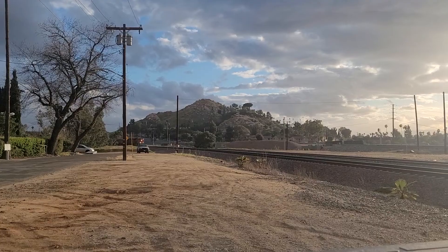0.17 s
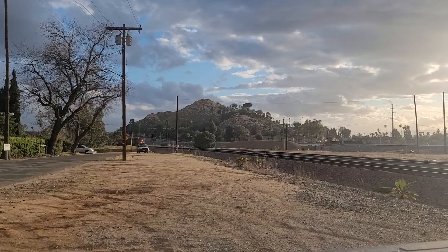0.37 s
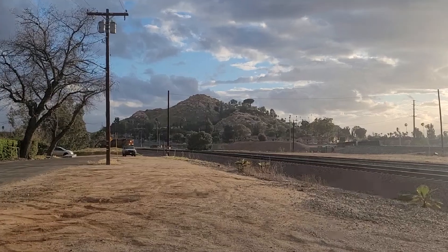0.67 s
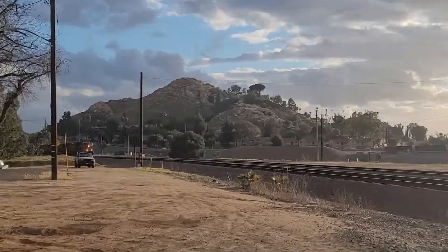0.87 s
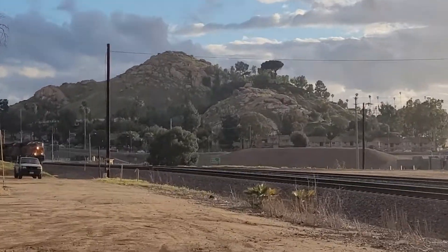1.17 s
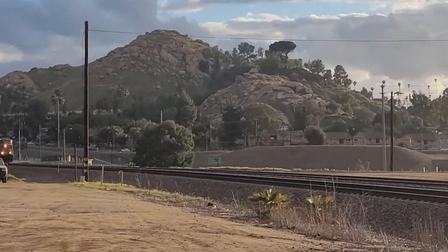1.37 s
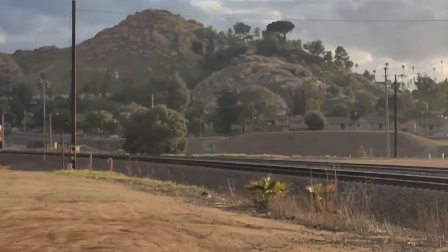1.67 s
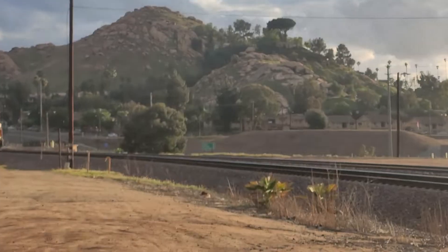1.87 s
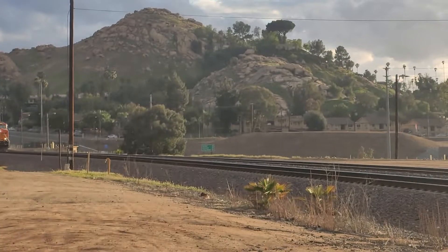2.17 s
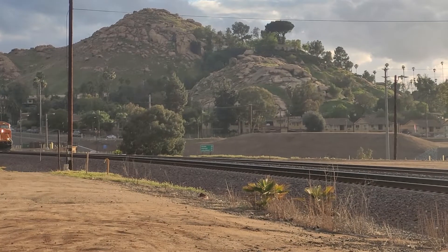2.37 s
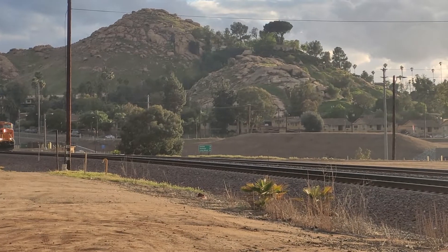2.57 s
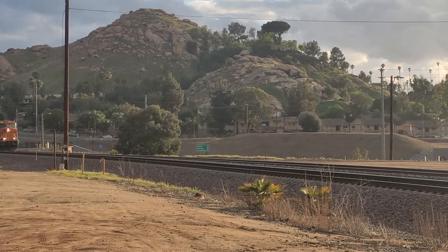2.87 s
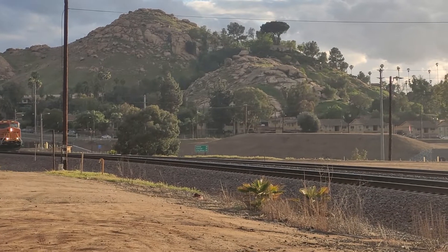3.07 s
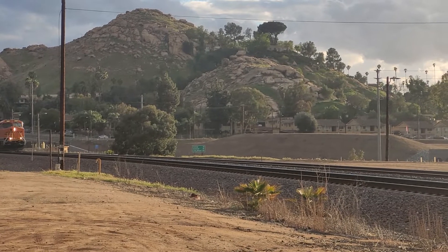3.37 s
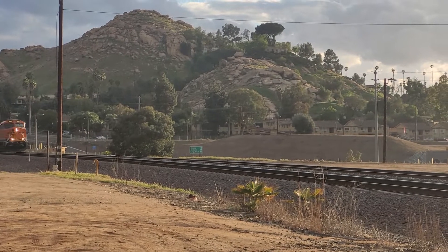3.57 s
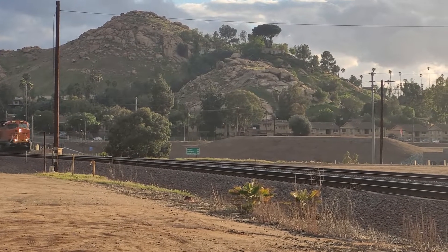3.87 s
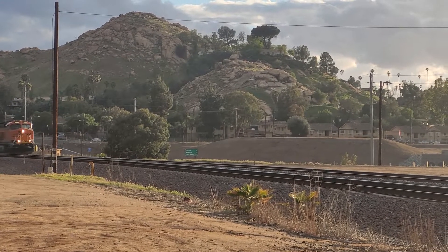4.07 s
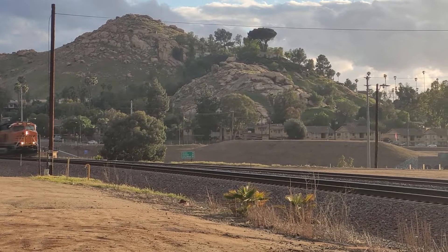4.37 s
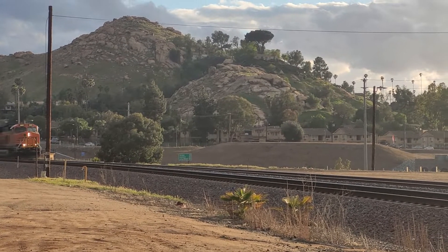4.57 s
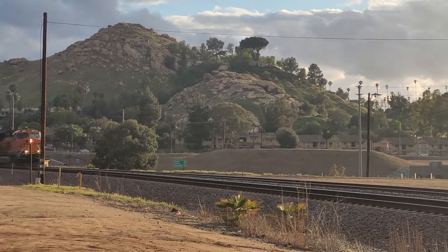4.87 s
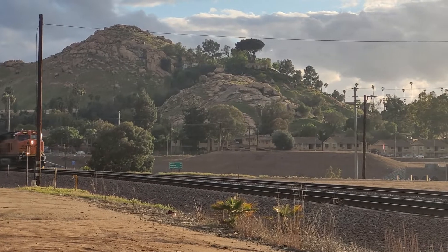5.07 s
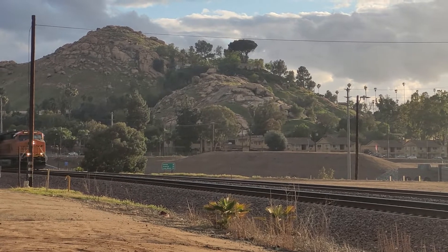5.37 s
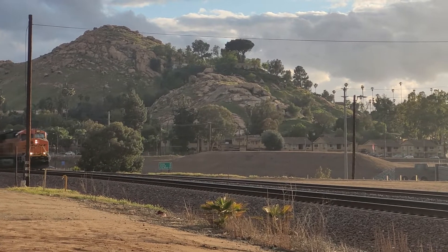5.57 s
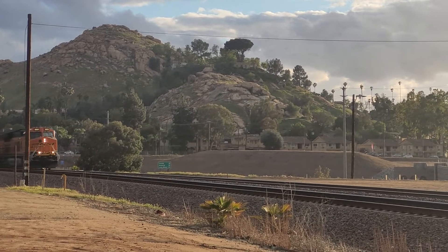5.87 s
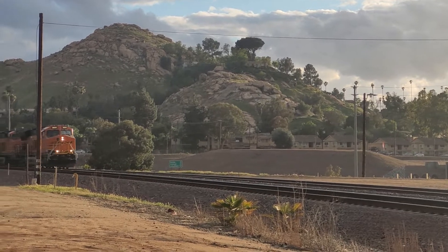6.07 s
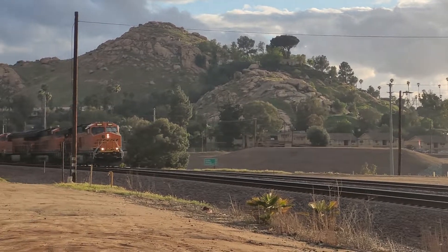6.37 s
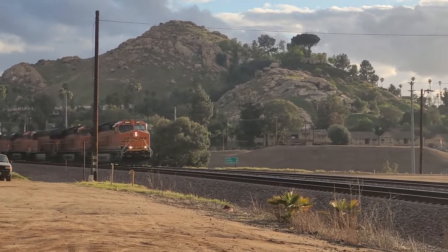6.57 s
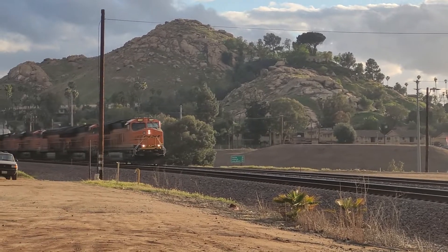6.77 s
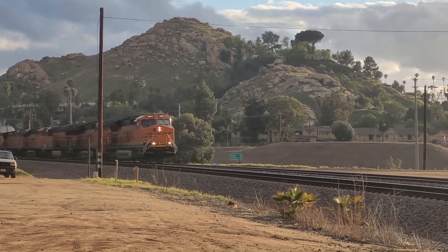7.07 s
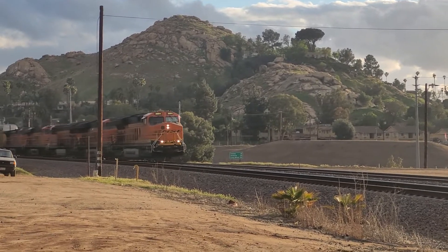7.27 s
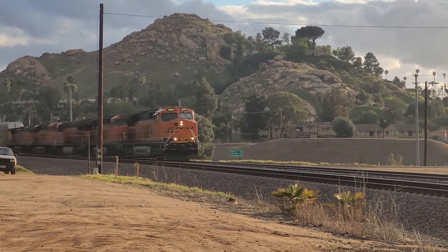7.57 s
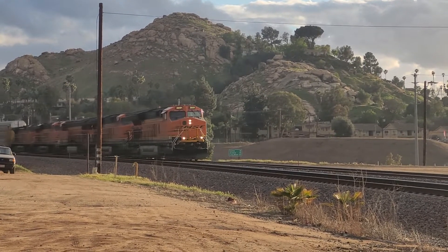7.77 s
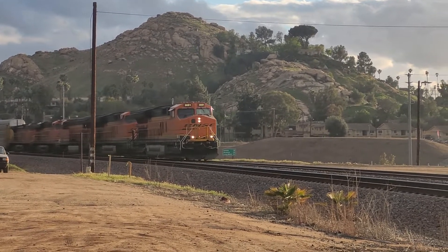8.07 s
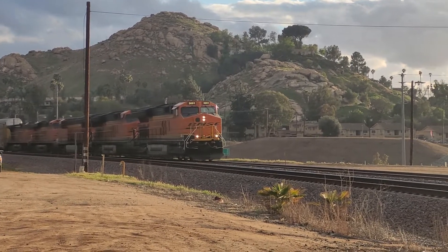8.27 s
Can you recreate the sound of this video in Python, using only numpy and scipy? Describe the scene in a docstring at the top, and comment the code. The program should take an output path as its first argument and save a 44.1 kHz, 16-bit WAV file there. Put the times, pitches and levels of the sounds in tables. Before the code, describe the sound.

Outdoors beside a rail line, an approaching freight locomotive throbs low and steady, with a soft fan whine, dull wheel roar and very high rail hiss mostly on the right. Just past the middle, one loud, buzzing five-note air horn blast lasts under a second, sags and dulls, leaving faint echoes from the hills. Then wheel sizzle and hiss grow fuller. Distant stereo microphone in the open.

```python
"""A freight train nears across open ground: its diesels throb on orders of the firing rate, a fan whines,
wheel noise roars low, and the rails give a broad, very high hiss, mostly on the right, jumping up partway.
Then a five-bell air horn gives one blast of buzzing harmonic stacks and mixed tones over turbulent air,
which sags and dulls as its valve closes and leaves dull, scattered echoes from the hills.
Afterwards a few faint tones swell, the wheel sizzle grows and the rail hiss becomes louder and fuller."""
import sys
import numpy as np
from scipy import signal
from scipy.fft import rfft, irfft, next_fast_len
from scipy.io import wavfile

SR = 44100
rng = np.random.default_rng(int(sys.argv[2]) if len(sys.argv) > 2 else 0)


def master(y):
    """Save y as 16-bit WAV."""
    cut = np.clip(np.atleast_2d(y).T, -1, 1)
    pcm = np.round(cut * 32767)  # scale
    wavfile.write(sys.argv[1], SR, pcm.astype(np.int16))


N = 371763

# Stereo image of the train. Each row: frequency in Hz, left-right likeness (1 is identical).
TRAIN_LIKENESS = [(60, 0.96), (260, 0.92), (520, 0.82), (780, 0.2), (1500, 0.028), (3600, 0.14),
                  (6500, 0.11), (10700, 0.15), (11500, 0.29), (12800, 0.68), (14600, 0.87), (16000, 0.82)]
# Stereo balance of the train. Each row: frequency in Hz, left minus right level in dB.
TRAIN_BALANCE = [(60, 4), (120, 1), (240, -1), (480, 1), (950, -1.5), (1890, 3), (3770, -7), (7520, 0.5),
                 (15000, -14)]

# Broad, very high hiss of the rails. Each row: frequency in Hz, relative power density in dB per Hz.
RAIL_SPECTRUM = [(9800, -54), (10300, -42), (10500, -13), (11500, -5), (12500, -1), (13700, -1.5),
                 (14200, 2), (15000, 2.5), (16000, 2)]
# Faint narrow peaks in the rail hiss. Each row: centre in Hz, width in Hz, relative level in dB.
RAIL_PEAKS = [(10710, 110, 4.5), (11700, 52, -1), (10900, 64, -18), (11100, 47, -15), (11940, 80, -13),
              (13000, 82, -16), (13900, 100, -8), (14000, 75, -24), (14700, 86, -21), (15060, 89, -20),
              (15700, 53, -7)]
# Course of the rail hiss. Each row: time in seconds, level in dB, share of its lower part removed (0 to 1).
RAIL_COURSE = [(0.0, -35.5, 0.99), (0.55, -35, 1), (1.85, -40.5, 0.99), (2.1, -36, 1), (2.85, -35, 0.92),
               (3.15, -37.5, 0.83), (3.17, -32, 0.4), (3.75, -29.5, 0.61), (4.4, -33, 0.53),
               (5.4, -28, 0.78), (6.1, -34, 0.18), (6.5, -30, 0.084), (8.43, -28, 0.068)]
RAIL_LEAD_S = -0.00054   # negative: the right port hears the rails first

# Levels of the train noise; rumble and roar sink for a while after the horn, then rise again.
# Each row: time in seconds, rumble level in dB, roar level in dB, sizzle level in dB.
TRAIN_LEVELS = [(0.0, -32, -40.5, -66), (1.2, -30, -40, -58.5), (1.7, -30.5, -40.5, -62),
                (3.1, -28, -40, -55.5), (3.5, -31, -41, -53.5), (4.4, -31.5, -40, -51),
                (5.4, -36, -41, -51.5), (6.1, -37, -45, -52), (6.6, -32, -40.5, -47.5),
                (7.2, -31, -39.5, -45), (8.0, -29.5, -39.5, -44), (8.43, -28.5, -39, -44)]
# Low wheel noise. Each row: frequency in Hz, relative power density in dB per Hz.
ROAR_SPECTRUM = [(120, -9), (185, -7), (215, -11), (244, -10), (281, -5.5), (335, -15.5), (505, -12),
                 (727, -14), (1010, -12.5), (1670, -14.5), (3300, -36.5), (4290, -31), (7260, -120)]
# A drone in the roar. Each row: centre in Hz, width in Hz, relative level in dB.
ROAR_DRONE = [(454.5, 4.1, -2), (503.5, 10.7, 0.3), (904, 17, -5), (984.6, 13.4, 2.5), (1447, 19, -2.5),
              (2025, 245, -11.5)]
# Bright wheel noise. Each row: frequency in Hz, relative power density in dB per Hz.
SIZZLE_SPECTRUM = [(2300, -8.5), (2830, -11), (4100, 1), (5400, -6), (6100, -2.5), (6960, -4),
                   (7720, -18.5), (8500, -5), (8900, -16.5), (10000, -21)]
SIZZLE_FAR_DULLING = 1.06   # dB of treble lost per dB that the sizzle is below its closest level

# Tone of the fan. Each row: time in seconds, pitch in Hz, level in dB.
FAN_COURSE = [(0, 218, -48), (1.8, 218.5, -44), (2.7, 218.5, -41), (3.4, 219, -44), (4.3, 220.5, -43),
              (5.4, 219.5, -46), (6.0, 216, -43), (6.8, 210, -41), (7.5, 208, -39.5), (7.9, 206.5, -40),
              (8.43, 204.5, -44)]
FAN_OCTAVE_DB = -19   # second partial relative to the first
# Thin tones that each swell once. Each row: middle in seconds, half width in seconds, pitch in Hz, level in dB.
SWELLING_TONES = [(6.45, .35, 446, -51), (6.45, .5, 479, -51), (6.5, .3, 587, -54), (6.75, .3, 881, -52),
                  (6.95, .28, 497, -49), (7.2, .4, 896, -54), (7.75, .55, 985, -56), (8.0, .3, 481, -53)]

FIRING_HZ = 19.9
# Orders of the diesels' firing rate. Each row: multiple of the firing rate, relative level in dB.
FIRING_ORDERS = [(2.001, -8), (3, 5), (3.6, -34), (5, 1.5), (6, -4), (7, -4.5)]
# Broad engine noise. Each row: frequency in Hz, relative power density in dB per Hz.
RUMBLE_SPECTRUM = [(22, -41), (34, -28), (40, 0.5), (60, 0.5), (107, -1.5), (135, -7.5), (187, -17),
                   (243, -16.5), (330, -35)]
THROB_SHARE_DB, RUMBLE_SHARE_DB = -2, -1.5

HILLS_T60_S, HILLS_DB, HILLS_CUT_HZ = 1.35, -26, 1300
HILLS_BLUR = .6   # moving air on the long way round smears the echoed tones

# Horn bells. Each row: settled pitch in Hz, then the relative levels in dB of its partials in order.
HORN_BELLS = [(274.8, -23.5, -22.5, -34, -28.5, -41, -38, -45, -60, -49, -60, -52, -55, -52, -54, -58),
              (325.5, -34, -23.5, -30.5, -32.5, -42, -45, -51, -54, -54, -52, -52, -51, -54),
              (379.1, -29, -27, -47, -43, -41, -51, -48, -52, -56, -53, -58, -63, -71),
              (495.0, -24, -29, -33, -43, -48, -55, -48, -51, -60, -73),
              (531.2, -21, -30, -50, -43, -48, -52, -47, -58, -70)]
# Tones mixed by bells that pull on each other through one air line. Each row: bell index, its multiple,
# other bell index, its multiple, relative level in dB.
MIXED_TONES = [(4, 1, 0, -1, -40), (4, 1, 0, 1, -43), (4, 1, 0, 2, -31), (4, 1, 0, 3, -46),
               (4, 1, 0, 4, -44), (4, -1, 0, 3, -48), (4, -1, 0, 4, -43), (4, -1, 0, 5, -42),
               (4, -1, 0, 6, -46), (4, -1, 0, 7, -50), (4, -1, 0, 8, -47), (4, 2, 0, -2, -41),
               (4, 4, 0, -2, -52), (4, 3, 0, 2, -49), (4, 4, 0, 2, -51), (1, 1, 0, 1, -42),
               (3, 2, 2, 2, -52), (1, 3, 0, 3, -52), (4, 1, 2, 1, -52), (2, 1, 0, 1, -45),
               (4, 1, 3, 1, -46), (1, 1, 0, 4, -47), (0, 1, 2, 3, -43), (3, 1, 2, 4, -50),
               (4, -1, 3, 4, -47), (4, 1, 1, -1, -52), (1, 1, 2, 1, -51)]
# The lowest and highest bell also mix all through this band.
REEDY_LOW_HZ, REEDY_HIGH_HZ, REEDY_DB = 1700, 4300, -58
# Partials that stand out or hang back while the pitch is still sharp. Each row: bell index, partial number,
# level offset in dB.
UNSETTLED_PARTIALS = [(0, 3, 13), (1, 1, -4), (1, 3, -9), (1, 4, 6), (2, 2, -11), (3, 2, -9), (3, 3, -4)]
# Partials that swell or sink through the hold. Each row: bell index, partial number, slope in dB per second.
LEANING_PARTIALS = [(0, 1, -5), (0, 2, -7), (0, 3, -8), (0, 6, 8), (1, 4, -10), (2, 2, 9), (2, 5, 8)]
# Pitch change of the diaphragms. Each row, one per bell: sharpness at the start in percent,
# sag as the air runs out in percent per second.
BELL_PITCH_DRIFT = [(3.2, 0), (2.7, 6), (3.0, 0), (2.7, 6), (1.6, 6)]
# Response of the bells to the valve. Each row, one per bell: speech delay in seconds, share of the closing fade.
BELL_RESPONSE = [(.013, .8), (.014, .4), (.001, .9), (.017, .75), (.018, .9)]
# Air rush in the bells. Each row: frequency in Hz, relative power density in dB per Hz.
RUSH_SPECTRUM = [(200, -42), (500, 2.5), (1000, -6), (1250, -8), (1500, 2.5), (2200, -7), (2900, -12),
                 (3900, -7), (5000, -27.5), (6000, -59), (7200, -45), (10300, -52.5)]
# Stereo image of the air rush. Each row: frequency in Hz, left-right likeness.
RUSH_STEREO = [(200, .95), (2000, .8), (4000, .75), (10000, .5)]
# Stereo balance of the horn. Each row: frequency in Hz, left minus right level in dB.
HORN_STEREO_BALANCE = [(60, -4), (130, 14), (290, -1), (640, -1.0), (1410, 0), (3100, 5.5), (6820, -48),
                       (15000, 10)]
HORN_LEAD_S = 0.000095   # the left port hears the horn first

# The valve opens, holds and closes, then the diaphragms stall.
OPEN_AT_S, CLOSE_AT_S, STALL_AT_S = 4.384, 5.103, 5.31
HOLD_DB, ATTACK_S, BRIGHTEN_S, SETTLE_S = 4, 0.0079, 0.034, .08
FADE_DB_PER_S, FADE_QUICKENS_DB_PER_S2, STALL_DB_PER_S = 27, 170, 480
START_DULL_DB_PER_OCTAVE, HOLD_DULL_DB_PER_OCTAVE, DULLING_DB_PER_OCTAVE_PER_S = 9.5, -0.18, 66
DULLING_LAG_S = .03   # the treble holds a little after the valve starts to close
RUSH_DB, RUSH_FOLLOWS_DULLING = -27, 0.73   # held level; dB lost per dB per octave of dulling
RUSH_LAG_S, RUSH_RISE_DB_PER_S = .06, 900   # the rush reaches full strength after the tones
WANDER = .0004   # share by which each diaphragm's pitch wanders
BITE_DB = 3.5   # extra treble while the diaphragms settle
GUST_DB = 1.3   # moving air makes the whole top of the horn swell and sink together
# A small click is heard: time skips ahead by some milliseconds, shifting only the horn tones.
SKIP_AT_S, SKIP_S, SKIP_GAP_S = 4.9894, .0231, .00011

GAIN_KNEE_DB, GAIN_SLOPE, GAIN_MEMORY_S = -22, 0.26, 0.075   # slope: dB taken off per dB above the knee
CUTOFF_HZ = 15720


def from_db(db):
    """Amplitude gain is ten to the power of decibels over twenty."""
    return 10 ** (np.asarray(db) / 20)


def rms_one(x):
    """Normalisation: division by the root mean square gives unit effective amplitude."""
    return x / np.sqrt(np.mean(x ** 2) + 1e-20)


def in_time(rows):
    """Linear interpolation gives each column of a time table at every sample."""
    s, *columns = np.transpose(rows)
    return [np.interp(np.arange(N) / SR, s, column) for column in columns]


def at_hz(points, hz):
    """Interpolation on a log-frequency axis spaces a spectrum by musical interval."""
    table_hz, values = np.array(points).T
    return np.interp(np.log(hz), np.log(table_hz), values)


def drift(rate_hz):
    """Random fluctuation: white noise through a two-pole low-pass, with spread 1."""
    step = 40   # samples per slow value
    pole = np.exp(-2 * np.pi * rate_hz * step / SR)
    noise = rng.standard_normal(N // step + 2002)
    slow = signal.lfilter([1], [1, -2 * pole, pole * pole], noise)[2000:]   # drop the filter's start-up
    return np.interp(np.arange(N) / step, np.arange(len(slow)), rms_one(slow))


def sides(balance_db):
    """Level panning: a left-minus-right level is split equally between both sides."""
    return from_db(np.array([balance_db / 2, -balance_db / 2]))


def stereo_noise(spectrum, balance, patchy_db, flicker_rate, count, lead_s=0, peaks=(), peaks_db=0,
                 likeness=TRAIN_LIKENESS):
    """Partly coherent noise, shaped in frequency, in bands that flicker partly together; mid rms is 1."""
    size = next_fast_len(N)
    hz = np.maximum(np.arange(size // 2 + 1) * SR / size, 1)
    mid, side = rfft(rng.standard_normal((2, size)))
    alike = np.clip(at_hz(likeness, hz), -.99, .99)
    both = np.sqrt(1 + alike) * mid + np.sqrt(1 - alike) * side * [[1], [-1]]
    both[0] *= np.exp(2j * np.pi * hz * lead_s)   # a phase slope advances the left side
    power = from_db(2 * at_hz(spectrum, hz))
    for centre, width, level_db in peaks:
        power = power + from_db(2 * (level_db + peaks_db)) / (1 + (2 * (hz - centre) / width) ** 2)
    both = both * np.sqrt(power) * sides(at_hz(balance, hz))
    edges = np.geomspace(spectrum[0][0], spectrum[-1][0], count + 1)
    together = drift(flicker_rate)
    out = 0
    for low, high in zip(edges, edges[1:]):
        band = irfft(both * ((hz >= low) & (hz < high)), size)[:, :N]
        out = out + band * from_db(patchy_db * (0.21 * together + drift(flicker_rate)))
    return out / np.sqrt(np.mean(out.mean(axis=0) ** 2))


def rails():
    """Band-shaped noise: broad, very high hiss with a few faint narrow peaks; its lower part comes and goes."""
    hiss_db, dull = in_time(RAIL_COURSE)
    hiss = stereo_noise(RAIL_SPECTRUM, TRAIN_BALANCE, patchy_db=1.6, flicker_rate=12.0, count=5,
                        lead_s=RAIL_LEAD_S, peaks=RAIL_PEAKS, peaks_db=-12.0)
    lower = signal.sosfiltfilt(signal.butter(3, 12600, fs=SR, output="sos"), hiss)
    return from_db(hiss_db) * (hiss - np.clip(dull, 0, 1) * lower)


def wheels(roar_db, sizzle_db):
    """Broadband wheel noise: a low roar with a drone, and a sizzle losing less treble as it nears."""
    roar = stereo_noise(ROAR_SPECTRUM, TRAIN_BALANCE, patchy_db=0.77, flicker_rate=13.0, count=4,
                        peaks=ROAR_DRONE, peaks_db=-7)
    sizzle = stereo_noise(SIZZLE_SPECTRUM, TRAIN_BALANCE, patchy_db=.9, flicker_rate=11.0, count=4,
                          lead_s=HORN_LEAD_S)
    top = signal.sosfiltfilt(signal.butter(2, 5200, "high", fs=SR, output="sos"), sizzle)
    top_kept = from_db(SIZZLE_FAR_DULLING * (sizzle_db - sizzle_db.max()))
    return from_db(roar_db) * roar + from_db(sizzle_db) * (sizzle - (1 - top_kept) * top)


def faint_tones():
    """Amplitude envelopes: thin sines from the train each swell and sink along a bell curve."""
    t = np.arange(N) / SR
    out = 0
    for middle_s, width_s, hz, level_db in SWELLING_TONES:
        swell = np.exp(-((t - middle_s) / width_s) ** 2) * from_db(level_db + drift(2))
        out = out + swell * np.sin(2 * np.pi * hz * t + .6 * drift(2))
    return np.sqrt(2) * out


def fan():
    """Frequency modulation: the phase integrates a changing pitch, giving an unsteady tone and its octave."""
    hz, level_db = in_time(FAN_COURSE)
    wobble_db = .9 * drift(3)
    phase = 2 * np.pi * np.cumsum(hz) / SR + .1 * drift(4)
    tone = np.sin(phase) + from_db(FAN_OCTAVE_DB) * np.sin(2 * phase)
    return np.sqrt(2) * from_db(level_db + wobble_db) * tone


def diesels():
    """Periodic firing excites low orders, each swelling on its own, over broad rumble; rms is about 1."""
    turns = 2 * np.pi * np.cumsum(FIRING_HZ * (1 + .002 * drift(.3))) / SR
    throb = 0
    for order, level_db in FIRING_ORDERS:
        phase = order * turns + 0.32 * drift(1.2) + 2 * np.pi * rng.random()
        throb = throb + from_db(level_db + 3.84 * drift(1.26)) * np.sin(phase)
    throb = rms_one(throb) * sides(0.43)[:, None]
    rumble = stereo_noise(RUMBLE_SPECTRUM, TRAIN_BALANCE, patchy_db=-0.5, flicker_rate=4.9, count=3)
    return from_db(THROB_SHARE_DB) * throb + from_db(RUMBLE_SHARE_DB) * rumble


def hills(x):
    """Diffuse reflection: convolution with dull, decaying noise that differs on each side."""
    t = np.arange(round(1.6 * SR)) / SR
    shared, own = rng.standard_normal(len(t)), rng.standard_normal((2, len(t)))
    response = (shared + 1.05 * own) * from_db(-60 * t / HILLS_T60_S) * (t > .04)
    response = signal.sosfilt(signal.butter(1, HILLS_CUT_HZ, fs=SR, output="sos"), response)
    response /= np.sqrt(np.sum(response ** 2, axis=1, keepdims=True))   # unit energy
    x = x * (1 + HILLS_BLUR * drift(10)) / np.hypot(1, HILLS_BLUR)
    return signal.fftconvolve(x, response, axes=1)[:, :N]


def air_pressure(t):
    """Valve transients: air pressure governs each bell's loudness, the treble lost and the unsettled pitch."""
    since, closing, stalled = (np.maximum(t - at, 0) for at in (OPEN_AT_S, CLOSE_AT_S, STALL_AT_S))
    late_s, fade_share = np.transpose(BELL_RESPONSE)[:, :, None]
    attack = 1 - np.exp(-np.maximum(since - late_s, 0) / ATTACK_S)
    fade_db = (FADE_DB_PER_S + FADE_QUICKENS_DB_PER_S2 * closing) * closing
    loud_db = HOLD_DB + 40 * np.log10(1e-3 + attack) - fade_share * fade_db - STALL_DB_PER_S * stalled
    lack_db = START_DULL_DB_PER_OCTAVE * np.exp(-(since / BRIGHTEN_S) ** 2 / 2)
    lack_db = lack_db + DULLING_DB_PER_OCTAVE_PER_S * np.maximum(closing - DULLING_LAG_S, 0)
    unsettled = np.exp(-(since / SETTLE_S) ** 2)
    return loud_db, lack_db, unsettled, closing


def horn_partials(t, unsettled, pitch):
    """Nonlinear coupling: harmonics of each bell, with sum and difference tones between the bells."""
    early_db = {(bell, k): db for bell, k, db in UNSETTLED_PARTIALS}
    lean = {(bell, k): slope for bell, k, slope in LEANING_PARTIALS}
    from_middle = np.minimum(t, CLOSE_AT_S) - (OPEN_AT_S + CLOSE_AT_S) / 2
    partials = []
    for a, bell in enumerate(HORN_BELLS):
        for k, db in enumerate(bell[1:], 1):
            level_db = db + early_db.get((a, k), 0) * unsettled + lean.get((a, k), 0) * from_middle
            partials.append((a, k, a, 0, level_db))
    reedy = [(4, j, 0, k, REEDY_DB) for j in range(1, 8) for k in range(1, 15)
             if REEDY_LOW_HZ < j * pitch[4] + k * pitch[0] < REEDY_HIGH_HZ]
    return partials + MIXED_TONES + reedy


def horn():
    """Diaphragms buzz in harmonic stacks; turbulent air rushes and makes high partials waver."""
    span = slice(round(OPEN_AT_S * SR), round((STALL_AT_S + .2) * SR))
    t = np.arange(N)[span] / SR
    loud_db, lack_db, unsettled, closing = air_pressure(t)
    dulling_db = HOLD_DULL_DB_PER_OCTAVE + lack_db
    pitch = [bell[0] for bell in HORN_BELLS]
    pitch_ratio = np.array([1 + (start * unsettled - sag * closing) / 100 + WANDER * drift(5)[span]
                            for start, sag in BELL_PITCH_DRIFT])
    clock = np.cumsum(pitch_ratio, axis=1) / SR + SKIP_S * (t > SKIP_AT_S)
    gap = np.tanh(np.abs(t - SKIP_AT_S) / SKIP_GAP_S)
    wavers = np.array([drift(10.8)[span] for _ in range(8)])
    gust_db = GUST_DB * drift(9)[span] + BITE_DB * np.sqrt(unsettled)
    out = np.zeros((2, N))
    for a, j, b, k, level_db in horn_partials(t, unsettled, pitch):
        hz = j * pitch[a] + k * pitch[b]
        cycles = j * pitch[a] * clock[a] + k * pitch[b] * clock[b]
        # rows 0 and 3 act on both sides; rows 1 and 2 act on left and right
        shake = np.tanh(hz / 1500) * wavers[rng.permutation(8)[:4]]
        sway_db = 3.0 * shake[0] + 1.3 * shake[1:3] + gust_db * np.tanh((hz / 3000) ** 2)
        gain = np.sqrt(2) * from_db(level_db + loud_db[a] - dulling_db * np.log2(hz / 300) + sway_db)
        phase = 2 * np.pi * (cycles + hz * np.array([[HORN_LEAD_S], [0]]) + rng.random())
        phase = phase + np.minimum((hz / 2500) ** 2, 1.5) * shake[3] + .2 * shake[1:3]
        balance = sides(at_hz(HORN_STEREO_BALANCE, hz))[:, None]
        out[:, span] += gap * gain * balance * np.sin(phase)
    rush_db = RUSH_DB + loud_db[3] - HOLD_DB - RUSH_FOLLOWS_DULLING * lack_db
    rush_db = rush_db - RUSH_RISE_DB_PER_S * np.maximum(OPEN_AT_S + RUSH_LAG_S - t, 0)
    rush = stereo_noise(RUSH_SPECTRUM, HORN_STEREO_BALANCE, patchy_db=1.5, flicker_rate=16, count=8,
                        lead_s=HORN_LEAD_S, likeness=RUSH_STEREO)
    out[:, span] += from_db(rush_db + gust_db) * rush[:, span]
    return out


def gain_control(x):
    """Compression: gain falls as the recent mean power rises above a knee."""
    memory = np.exp(-1 / (GAIN_MEMORY_S * SR))
    power = signal.lfilter([1 - memory], [1, -memory], np.mean(x ** 2, axis=0))
    level_db = 10 * np.log10(power + 1e-12)
    return x * from_db(-GAIN_SLOPE * np.maximum(level_db - GAIN_KNEE_DB, 0))


def scene():
    """Superposition: the train's layers, the horn and its echoes add."""
    rumble_db, roar_db, sizzle_db = in_time(TRAIN_LEVELS)
    train = rails() + wheels(roar_db, sizzle_db) + faint_tones() + fan() + from_db(rumble_db) * diesels()
    blast = horn()
    return train + from_db(HILLS_DB) * hills(blast) + blast


def record(dry):
    """Saturation and band limiting: controlled gain, rounded peaks, then a steep low-pass."""
    rounded = 1.2 * np.tanh(gain_control(dry) / 1.2)
    return signal.sosfilt(signal.ellip(12, .5, 70, CUTOFF_HZ, fs=SR, output="sos"), rounded)


dry = scene()
out = record(dry)
master(out)
```